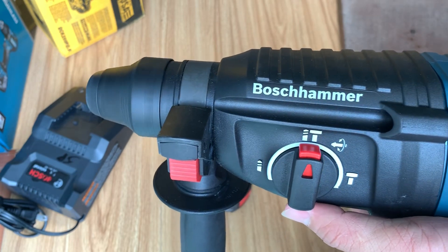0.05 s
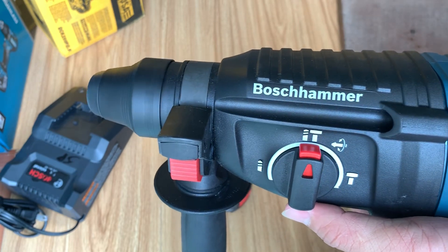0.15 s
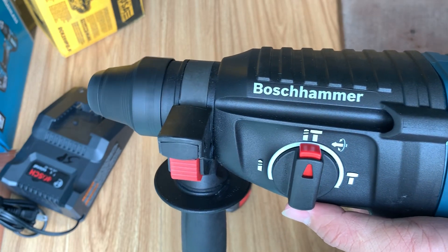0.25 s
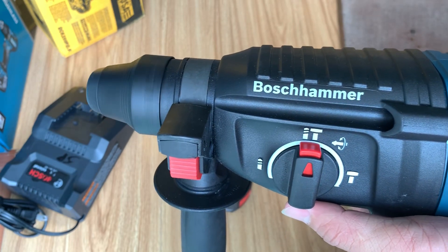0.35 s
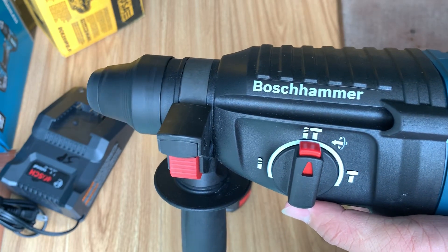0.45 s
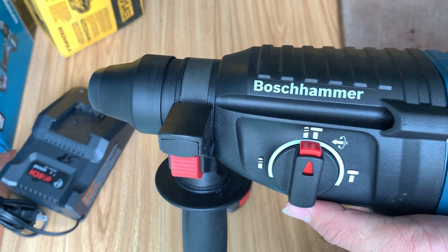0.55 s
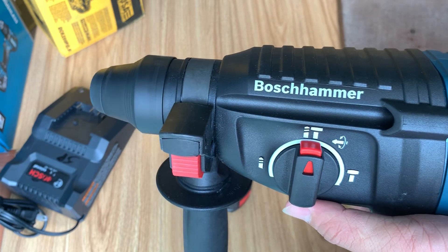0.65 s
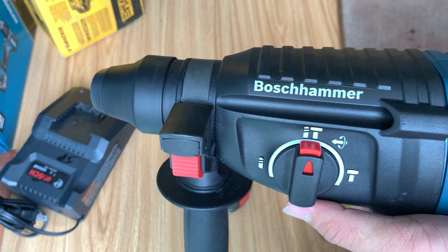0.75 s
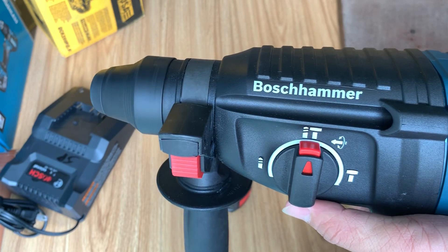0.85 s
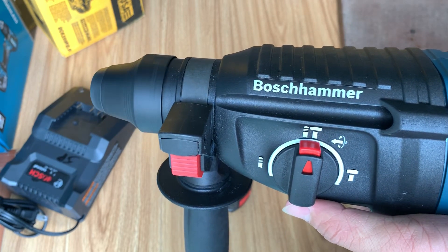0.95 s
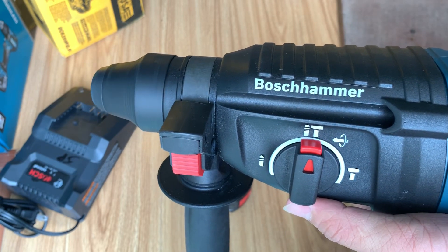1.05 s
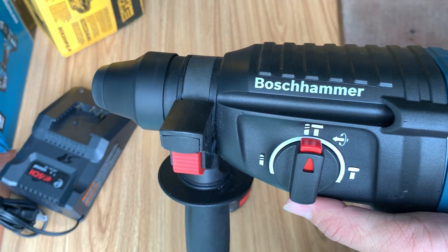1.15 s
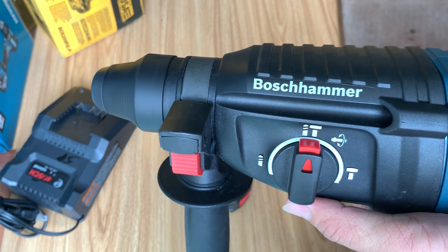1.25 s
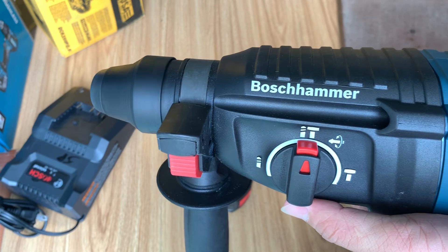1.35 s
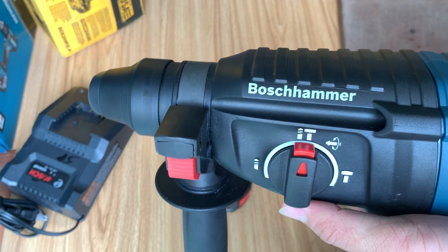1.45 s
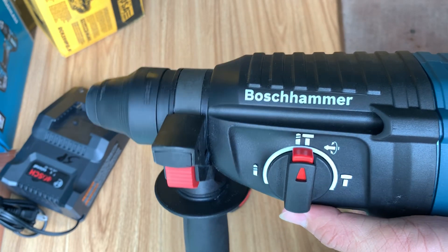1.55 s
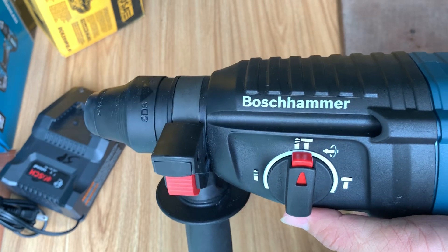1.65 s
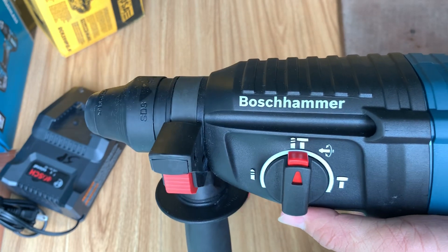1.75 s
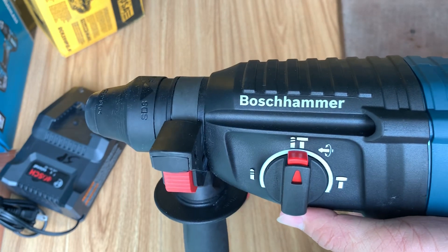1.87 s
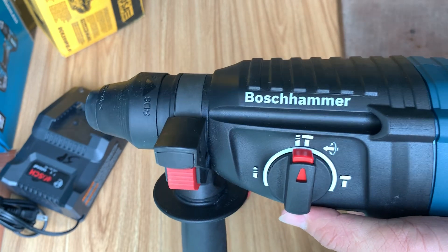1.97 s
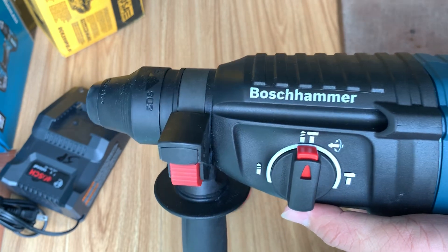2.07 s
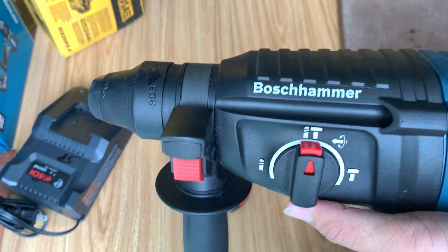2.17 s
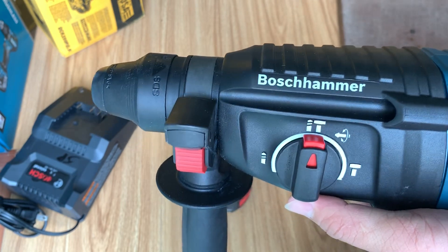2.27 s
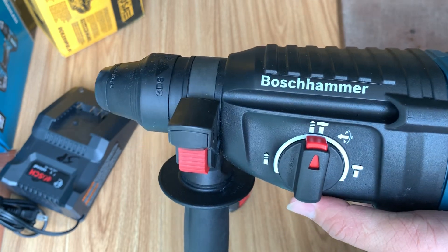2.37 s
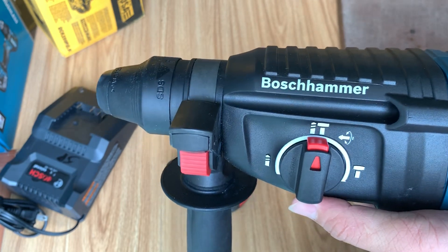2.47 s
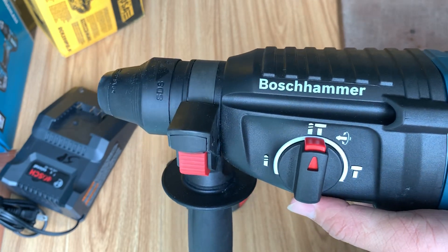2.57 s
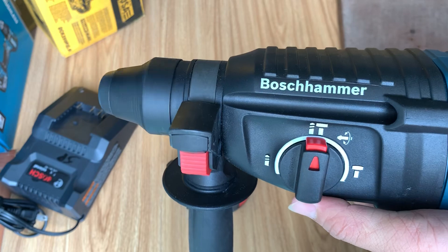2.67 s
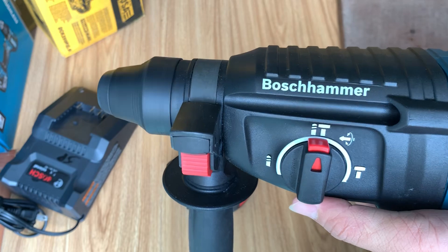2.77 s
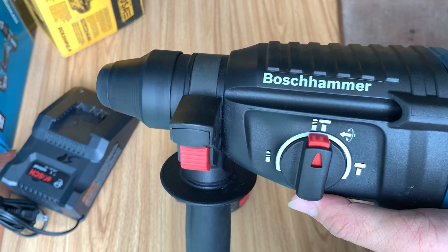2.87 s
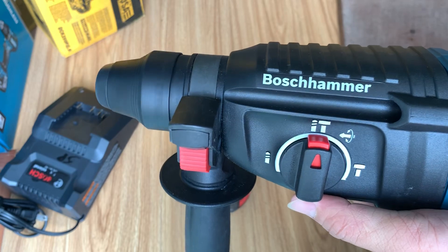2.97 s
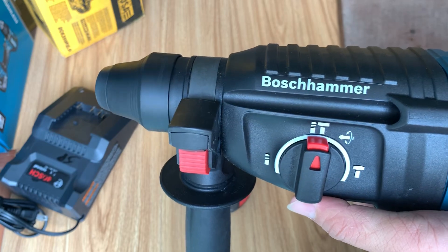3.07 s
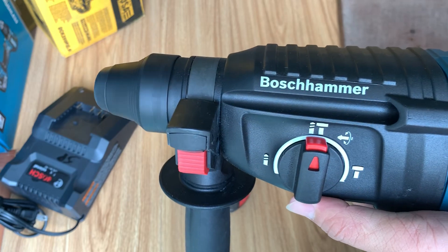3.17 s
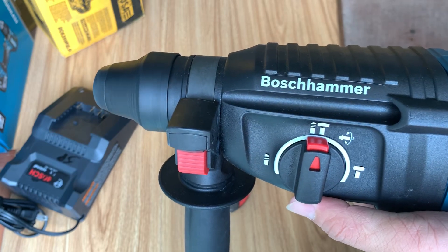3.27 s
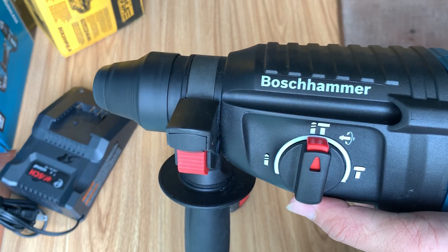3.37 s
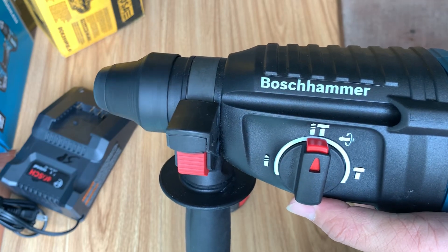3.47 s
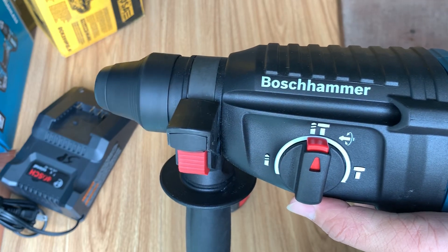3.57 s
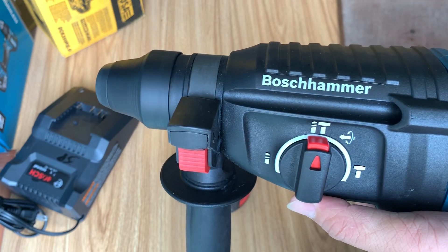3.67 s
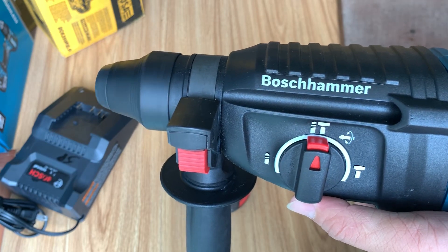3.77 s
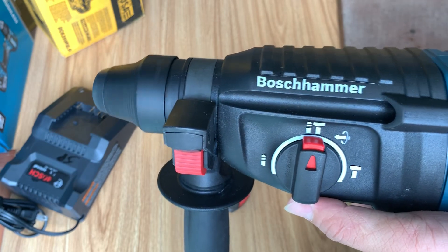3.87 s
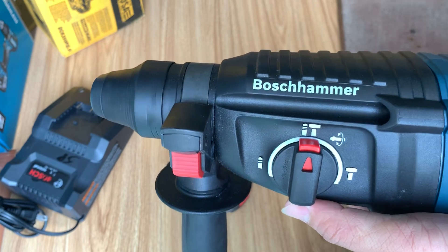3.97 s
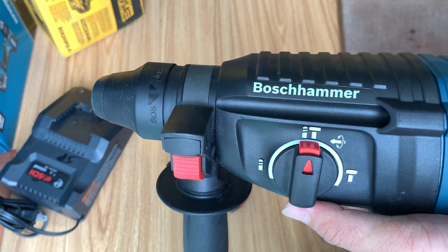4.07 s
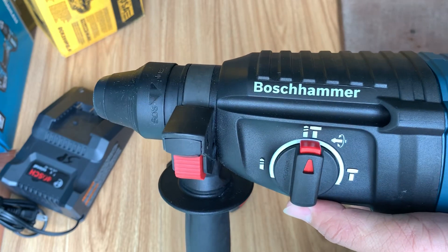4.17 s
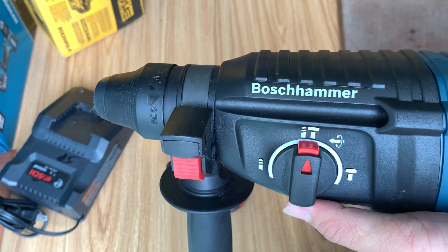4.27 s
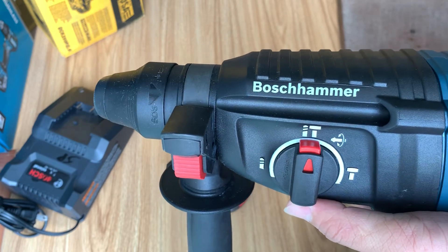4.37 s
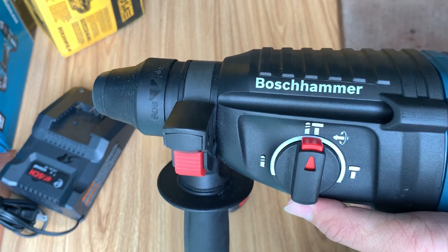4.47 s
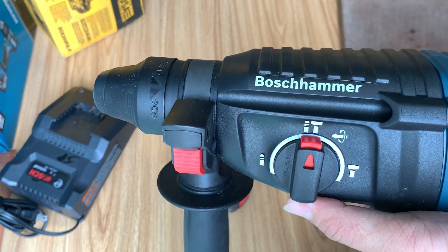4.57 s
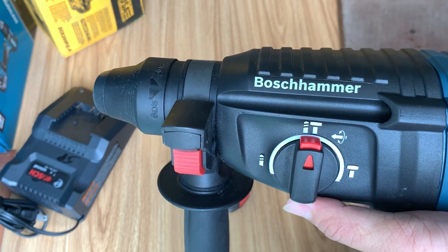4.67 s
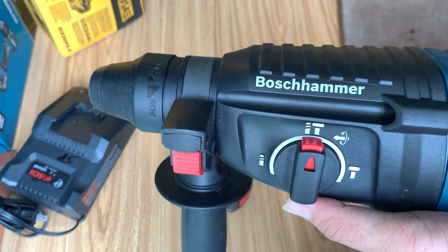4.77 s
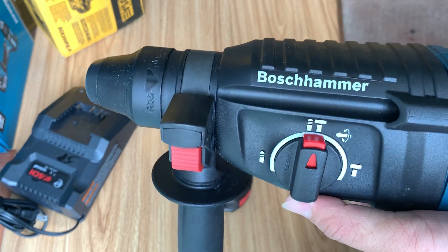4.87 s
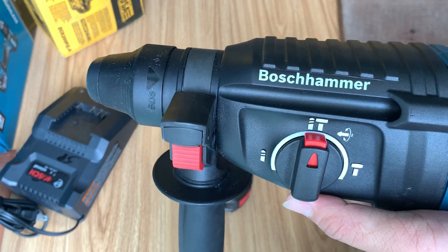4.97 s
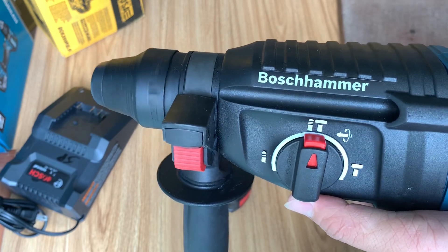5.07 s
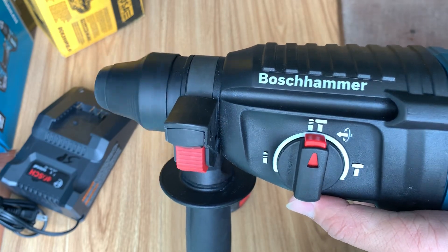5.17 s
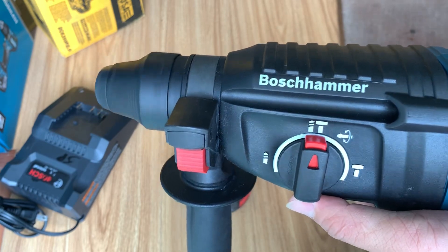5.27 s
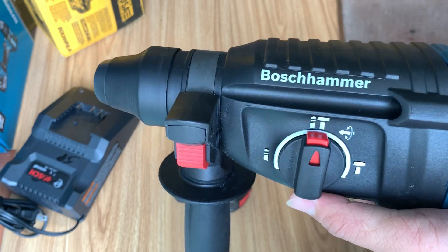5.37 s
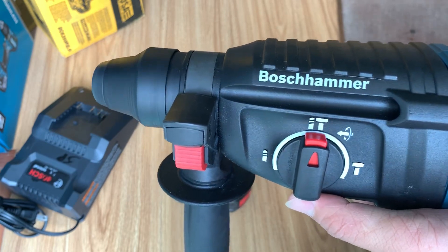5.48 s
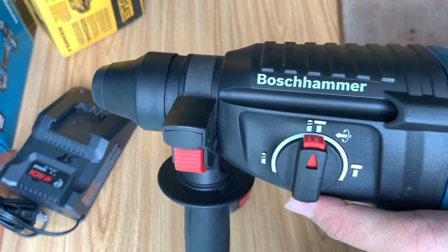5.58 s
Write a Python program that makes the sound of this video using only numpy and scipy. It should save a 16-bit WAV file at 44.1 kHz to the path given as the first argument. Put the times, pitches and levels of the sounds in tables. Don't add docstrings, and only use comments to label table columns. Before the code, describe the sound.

A handheld rotary hammer, already running without a bit, chatters at about seventy knocks a second with hard housing ring, gear grind and bright loose rattle. It stops, ticks down, and leaves clicks over distant engine rumble. A second pull whines briefly upward into slightly different hammering, then stops; a short third pull runs to the end. Close stereo microphone outdoors, very little reverberation.

```python
import sys
import numpy as np
from scipy import signal
from scipy.fft import rfft, irfft
from scipy.io import wavfile
from scipy.ndimage import uniform_filter1d

SR = 44100
rng = np.random.default_rng(int(sys.argv[2]) if len(sys.argv) > 2 else 0)


def master_out(mix):
    frames = np.transpose(np.atleast_2d(mix))
    ceiling = np.clip(frames, -1, 1)
    pcm = np.round(ceiling * 32767).astype(np.int16)
    wavfile.write(sys.argv[1], SR, pcm)


def nominal_scale(level):
    x = np.asarray(level, float) / 20
    return 10 ** x


N = 248095
TIME, HZ = np.arange(N) / SR, np.maximum(np.arange(N // 2 + 1) * SR / N, 1)

# motor_on_s, first_steady_blow_s, last_blow_s, blow_rate_hz, grip
PULLS = [
    (-1, .0051, 1.425, 72.16, 0),
    (2.628, 2.75345, 3.88, 72.14, 1),
    (5.056, 5.1791, 5.63, 72.15, 0),
]
# freq_hz, level_db_per_hz
GRIND = [
    [(110, -72.5), (180, -25), (310, -16), (400, -12.5), (514, -11), (562, -10), (715, -4.5), (801, 0.5),
     (932, -6), (1470, 1), (2120, -1), (2380, -5), (2600, -6), (2950, -1.5), (3700, -12), (4810, -58),
     (8140, -120)],
    [(110, -47.5), (180, -28), (238, -18), (284, -14), (465, -13), (562, 0), (646, -2), (801, 6),
     (864, -10), (1070, 0), (1200, 4), (1940, 0), (2560, -2.5), (2980, -2), (3700, -13.5), (4810, -55.5),
     (8140, -120)],
]
# freq_hz, level_db_per_hz
RATTLE = [(3300, 6.5), (3550, -15.5), (3750, -4.5), (4390, -1), (4680, -2.5), (5050, -0.5), (5420, -3.5),
          (5900, -1), (6830, -5), (7600, -6), (8700, -5.5), (9700, -8.5), (10700, 0), (11800, -14.5),
          (13000, -9.5), (14300, -16), (15750, -27)]


def rms_one(x):
    return x / np.sqrt(np.mean(x ** 2) + 1e-20)


def soft(x):
    return np.sin(np.pi / 2 * np.clip(x, 0, 1)) ** 2


def in_time(table):
    s, *columns = np.transpose(table)
    return [np.interp(TIME, s, c) for c in columns]


def at_hz(points):
    hz, value = np.transpose(points)
    return np.interp(np.log(HZ), np.log(np.maximum(hz, 1)), value)


def colour(x, spectrum):
    inward = np.minimum(np.log(HZ / spectrum[0][0]), np.log(spectrum[-1][0] / HZ))
    return rms_one(irfft(rfft(x) * nominal_scale(at_hz(spectrum)) * soft(inward / .05 + .5), N))


def drift(rate_hz):
    r = np.exp(-80 * np.pi * rate_hz / SR)
    slow = signal.lfilter([1], [1, -2 * r, r * r], rng.standard_normal(N // 40 + 2002))[2000:]
    return np.interp(np.arange(N) / 40, np.arange(len(slow)), rms_one(slow))


def spikes(times_s, heights):
    out = np.full(N, 1e-18)
    at = np.clip(np.round(np.asarray(times_s) * SR).astype(int), 0, N - 1)
    np.add.at(out, at, heights)
    return out


def ring(hits, hz, t60_s):
    r, w = nominal_scale(-60 / (t60_s * SR)), 2 * np.pi * hz / SR
    return signal.lfilter([0, np.sin(w)], [1, -2 * r * np.cos(w), r * r], hits)


def fade(hits, ms):
    return signal.lfilter([1], [1, -np.exp(-1000 / (ms * SR))], hits)


def narrow_noise(hz, width_hz):
    return rms_one(ring(rng.standard_normal(N), hz, 4.6 / width_hz))


def grains(spread_db):
    return rng.standard_normal((2, N)) * nominal_scale(spread_db * rng.standard_normal(N))


def pull(start, first, last, rate, grip, boom_db, top_db, housing_db, rattle_db):
    bite_delay_s, bite_rise_s = .106, .034
    settle_ms, settle_blows = 1.5, 1.4
    speed_wander_ms = .055
    return_ms, return_gain = (3.4, 4.1)[grip], (1.3, 2.2)[grip]
    tone_lag_ms = (2.5, 1.5)[grip]
    shade_db = (7.5, 8.5)[grip]
    rotor_turns, rotor_ripple = 6, .13
    # delay_ms, level_db
    jolt_rows = [
        [(.1, 1), (1.6, -7), (2.4, -8), (3.4, -8), (10.6, -10), (11.7, -9)],
        [(-2.6, -3), (-.5, -6), (.1, 0), (1.9, -6), (2.8, -6), (9.6, -8)],
    ]
    # blow_rate_multiple (negative = opposite phase), grip_0_db, grip_1_db
    gear_tones = [(1, -38, -37.5), (2, -37.5, -34), (3, -43, -38.5), (4, -38, -56), (5, -29.5, -57.5),
                  (8, -57, -26), (9, -40, -21.5), (10, -23.5, -59), (18, -22.5, -42), (-24, -20, -29.5),
                  (45.55, -30, -35), (52, -30.5, -25.5)]

    blows = np.arange(first, last, 1 / rate)
    chance = rng.standard_normal((len(blows), 2))
    blows = blows + .00003 * chance[:, 0]
    force = nominal_scale((.5, 1.5)[grip] * chance[:, 1] + .6 * np.interp(blows, TIME, drift(5)))
    early_ms = settle_ms * np.exp(-rate * np.maximum(TIME - first, 0) / settle_blows)
    late_ms = speed_wander_ms * drift(7.8) - (start > 0) * early_ms
    blows = blows + np.interp(blows, TIME, late_ms) / 1000
    force = force * np.clip((blows - start - bite_delay_s) / bite_rise_s, 0, 1)
    steady, on = (TIME > first) & (TIME < last + .01), TIME >= start
    knock = knocks(blows, grip, force, uneven_db=.6, boom_db=boom_db, top_db=top_db)

    delay_ms, jolt_db = np.transpose(jolt_rows[grip])
    jolts = nominal_scale(jolt_db + 2.5 * rng.standard_normal((len(blows), len(delay_ms))))
    jolts = spikes((blows[:, None] + delay_ms / 1000).ravel(), jolts.ravel())
    scuff = fade(spikes(blows[1:] - return_ms / 1000, return_gain), 1.3)
    scuff = scuff + (.6, .3)[grip] * fade(jolts, 2)
    rotor = np.cos(2 * np.pi * rotor_turns * (rate * (TIME - first - late_ms / 1000) - .015))
    shake = 4.2 * fade(jolts, .3) + .55 * fade(jolts, 3.5) + rotor_ripple * 2 * rotor
    grind = np.array([colour(g, GRIND[grip]) for g in grains(1.0) * (1 + scuff)])
    shaded = [(hz, db - shade_db * (10000 < hz < 11000)) for hz, db in RATTLE]
    contacts = grains(0.9) * (1 + shake) * nominal_scale(0.68 * drift(10))
    rattle = np.array([colour(g, shaded) for g in contacts])
    knock, grind, rattle = (v / np.std(v[..., steady]) for v in (knock, grind, rattle))

    turns = rate * (TIME - first - (late_ms + tone_lag_ms) / 1000)
    tones = 0
    for k, *db in gear_tones:
        phase = 2 * np.pi * k * turns + .006 * k * drift(8)
        tones = tones + nominal_scale(db[grip] + 2.5 * drift(9)) * np.sin(phase)
    grind_db = -11 * soft((TIME - start - .07) / .07) * (TIME < last + .01)
    low, high = nominal_scale(housing_db) * on, nominal_scale(rattle_db) * on
    direct = low * (nominal_scale(-6.0) * knock + nominal_scale(grind_db) * grind[0] + 1.35 * tones * steady)
    direct = direct + high * (nominal_scale(-3.5) * rattle[0] + 2.4 * chuck(blows, force))
    twin = low * nominal_scale(-1.5) * grind[1] + high * nominal_scale(.5) * rattle[1]
    return ports(direct, twin, grip), direct


def effort(start, first, last, levels):
    run_up_s, run_up_power = 0.11, (3.7, 4.3)
    let_go_db, let_go_s, coast_db_per_s = (6.5, 0.5), 0.014, (172.5, 170.5)
    speed = np.clip((TIME - start) / run_up_s, 1e-4, 1)
    after_s = np.maximum(TIME - last, 0)
    steady_s = np.clip(TIME, first, last) - first
    out = []
    for k in range(2):
        level_db = levels[k] - levels[k + 2] * steady_s + 20 * run_up_power[k] * np.log10(speed)
        release_db = let_go_db[k] * (1 - np.exp(-after_s / let_go_s)) + coast_db_per_s[k] * after_s
        out.append(level_db - release_db)
    return out


def knocks(times, grip, force, uneven_db, boom_db=0, top_db=0):
    grip_wander_db = .9
    # delay_ms, strength
    rebound = [
        (1.36, .3),
        (1.1, -.4),
    ]
    # freq_hz, t60_ms, level_db, polarity
    modes_a = [(365.3, 86, -24, 1), (436, 86, -18.5, -1), (576.8, 55, -10.5, -1), (793.4, 40.3, -5, 1),
               (966, 32, -26, 1), (1184, 70, -7.5, 1), (1453, 28, -3, -1), (1519, 64, -17, -1),
               (1640, 70, -16, -1), (1877, 12, -1.5, 1), (1883, 38, -19.5, -1), (1958, 50, -14, 1),
               (2090, 89, -27.5, -1), (2306, 20, -1, 1), (2504, 35, -5.5, -1), (2838, 17, 0, -1),
               (3130, 22, -4.5, 1), (3370, 34, -20.5, -1)]
    # freq_hz, t60_ms, level_db, polarity
    modes_b = [(288, 95, -33.5, 1), (368, 20, -26.5, -1), (688.4, 42, -13.5, 1), (765, 63, -23, 1),
               (992.4, 85, -23, -1), (1243, 64, -22.5, -1), (1292, 55, -25.5, 1), (1450, 70, -24, -1),
               (1459, 100, -29, 1), (1623, 23, -22.5, -1), (1794, 13, 0, -1), (2294, 46, -17, 1),
               (2283, 100, -28.5, -1), (2465, 31, -22, 1), (2630, 22, -26, -1), (2955, 18, -10.5, 1),
               (3038, 70, -29, 1), (3300, 40, -22.5, -1), (1717, 60, -24.5, 1), (1936, 57, -23, -1),
               (2190, 51, -21, 1)]

    delay_ms, strength = rebound[grip]
    modes = (modes_a, modes_b)[grip]
    uneven = force[:, None] * nominal_scale(uneven_db * rng.standard_normal((len(times), len(modes))))
    strength = strength + .17 * rng.standard_normal(len(times))
    hit_times = np.r_[times, times + delay_ms / 1000]
    out = 0
    for (hz, t60_ms, level_db, polarity), heights in zip(modes, uneven.T):
        wander_db = grip_wander_db * (1 + (hz < 900)) * np.interp(times, TIME, drift(3))
        heights = heights * nominal_scale(wander_db)
        hits = spikes(hit_times, np.r_[heights, strength * heights])
        mode_db = level_db + boom_db * (hz < 900) + top_db * (hz > 2700)
        out = out + polarity * nominal_scale(mode_db) * ring(hits, hz, t60_ms / 1000)
    return signal.sosfilt(signal.butter(3, 210, "high", fs=SR, output="sos"), out)


def chuck(times, force):
    # freq_hz, t60_ms, level_db
    holder_modes = [(4370, 34, -13.5), (5030, 28, -17), (6750, 2.8, -23.5), (3880, 14, -24),
                    (5850, 14, -20.5), (7250, 10, -23), (6550, 12, -26)]
    out = 0
    for hz, t60_ms, level_db in holder_modes:
        lag, size = rng.standard_normal((2, len(times)))
        hits = spikes(times + .0008 + .0003 * lag, force * nominal_scale(4 * size))
        out = out + nominal_scale(level_db) * ring(hits, hz, t60_ms / 1000)
    return out


def coasting(grip):
    # time_s, peak_db, clatter_db re peak
    coast_blows = [(1.437, -7, -17), (1.456, -14, -11.5), (1.479, -34.5, -27), (1.513, -21, -13.5),
                   (1.54, -20.5, -13), (1.552, -26.5, -21.5), (1.594, -37, -10.5), (2.657, -35, -4.5),
                   (2.666, -24.5, -7.5), (2.693, -28, -22.5), (2.701, -23, -5), (2.721, -21, -10.5),
                   (2.738, -15.5, -11), (3.891, -6, -17.5), (3.913, -16.5, -10.5), (3.939, -24, -13.5),
                   (3.941, -27.5, -5.5), (3.957, -29.5, -15), (3.974, -18.5, -10.5), (4.008, -18.5, -18.5),
                   (4.018, -28.5, -7), (5.127, -18.5, -9.5), (5.141, -19, -11.5), (5.163, -5.5, -15.5),
                   (5.178, -6.5, -18)]
    mine = [row for row in coast_blows if (2 < row[0] < 5) == grip]
    times, peak_db, bright_db = np.transpose(mine)
    out = nominal_scale(-20) * knocks(times, grip, nominal_scale(peak_db), uneven_db=2.5)
    out = out + chuck(times, nominal_scale(peak_db + bright_db + 12))
    clatter = [(hz, db - (1.5, 9.0)[grip] * (hz > 8000)) for hz, db in RATTLE]
    for level_db, spectrum in ((peak_db - 9, GRIND[1]), (peak_db + bright_db, clatter)):
        burst = rng.standard_normal(N) * fade(fade(spikes(times, nominal_scale(level_db)), 0.89), 3.1) / 35
        out += colour(burst, spectrum) * np.std(burst)
    return out


def whine():
    base_hz, base_db = 3200, -23.5
    # time_s, offset_hz, second_pull_db, third_pull_db
    steps = [(0, -70, -19, -40), (.015, -29.5, -20, -38), (.023, -26, -30, -36), (.035, -26, -18, -22),
             (.045, -1, -17, -16), (.058, -1, -26, -14), (.066, 10, -13, -22), (.075, 32, -12, -13),
             (.095, -8, -6, -7), (.112, -31, -19, -18), (.128, 0, 2, -2), (.14, 40, 1.5, -2),
             (.155, 78, -6, -7), (.23, 80, -24, -24)]
    s, above_hz, *levels = np.transpose(steps)
    out = np.zeros(N)
    for (start, *_), db in zip(PULLS[1:], levels):
        turns = np.cumsum(base_hz + np.interp(TIME - start, s, above_hz)) / SR
        level_db = base_db + np.interp(TIME - start, s, db, -150, -150) + 1.5 * drift(30)
        out += nominal_scale(level_db) * np.sin(2 * np.pi * turns + .45 * drift(50))
    return out


def gear_song():
    # time_s, freq_hz, level_db
    mesh = [(2.69, 1307, -56.5), (2.708, 1506, -41.5), (2.721, 1930, -35), (2.745, 2014, -29),
            (2.77, 2096, -53)]
    s, hz, db = np.transpose(mesh)
    phase = 2 * np.pi * np.cumsum(np.interp(TIME, s, hz)) / SR + .5 * drift(70)
    return nominal_scale(np.interp(TIME, s, db, -150, -150)) * np.sin(phase)


def ports(x, twin, grip):
    # freq_hz, likeness
    likeness = [(200, .85), (1000, .98), (1800, .97), (2800, .85), (4500, .62), (8000, .9), (14000, .95)]
    # freq_hz, left_minus_right_db
    tilt = [
        [(60, 9), (110, -11), (200, 5.5), (380, 0), (700, -9.5), (1290, 2), (2380, 0.5), (4400, -1.5),
         (8120, -1), (15000, 1)],
        [(60, 1.5), (110, 0.5), (200, -6), (380, -4.5), (700, -3), (1290, 1), (2380, 1), (4400, -2.5),
         (8120, -1.5), (15000, 1)],
    ]
    # freq_hz, left_lead_rad
    lead = [
        [(0, -0.5), (340, -1.4), (1030, 0.85), (3190, 0.5), (3790, 6), (5430, 3.5), (6720, 5), (8870, 3),
         (11400, -3), (12300, -10), (13000, -7), (14000, -16), (14500, -20.5), (15300, -3)],
        [(0, 5.5), (780, -1.5), (2240, 1.5), (3360, -2), (5770, -0.86), (7240, -8), (8350, -9), (10900, -28),
         (11100, -8), (12300, -22.5), (12700, -29), (14000, -39), (14600, -39.5), (15300, -28)],
    ]
    alike = at_hz(likeness)
    half = nominal_scale(at_hz(tilt[grip]) / 2) * np.exp(.5j * at_hz(lead[grip]))
    same = np.sqrt((1 + alike) / 2) * rfft(x)
    other = np.sqrt((1 - alike) / 2) * rfft(twin)
    return irfft(np.array([(same + other) * half, (same - other) / half]), N)


def clicks():
    room_send_db = -13.5
    # time_s, peak_db, brightness_0_1, left_minus_right_db, length_ms
    snaps = [(1.677, -51.5, 0.6, -5, 3.2), (1.883, -57.5, 0.08, -9.5, 4.7), (1.92, -49, 0.84, -10, 5.1),
             (1.9313, -27.5, 0.92, -16, 0.7), (1.9331, -28.5, 0.9, -3, 2), (2.222, -56, 0.1, 8.5, 4.3),
             (2.526, -43, 0.46, -7.5, 4.2), (2.563, -48.5, 0.3, -9, 5), (2.601, -55, 0.3, -10, 3.9),
             (2.619, -37, 0.1, -5, 4.6), (2.63, -30, 0.15, -3, 2.2), (2.6645, -30, 0.6, -4, 1.5),
             (5.127, -25.5, 0.7, 0, 2), (2.6251, -28, 0.33, -10, 2.5), (4.238, -58, 0.37, -11, 3.3),
             (4.309, -56, 0.6, -9, 8.3), (4.352, -58.5, 0.43, -15, 3.3), (4.635, -52, 0.2, 7, 5.96),
             (4.985, -59, .6, -6, 15), (4.995, -53, 0.3, -8.5, 3), (5.041, -50, 0.5, 2, 10),
             (5.062, -33, 0.6, -3, 3), (5.034, -40, 0.1, 8, 2.8), (5.0498, -33, 0.3, -17, 2.5),
             (5.0553, -25, 0.49, 10.5, 3)]
    # freq_hz, level_db_per_hz
    snap_spectrum = [(400, -45), (800, -34.5), (1100, -17), (2000, -25), (3000, -12.5), (4500, -13),
                     (6500, -15.5), (8000, -25), (12900, -35), (15500, -48)]
    # freq_hz, level_db_per_hz
    clunk_spectrum = [(180, -49), (300, -4.5), (674, 4.5), (1420, -0.5), (2610, -4.5), (3070, -18),
                      (3630, -24.5), (4880, -27), (7620, -36.5), (10800, -18.5), (15500, -28)]
    out, sent = np.zeros((2, N)), np.zeros(N)
    white = rng.standard_normal(N)
    dull, bright = colour(white, clunk_spectrum), colour(white, snap_spectrum)
    age_ms = 1000 * np.arange(2000) / SR
    for s, peak_db, share, pan_db, ms in snaps:
        at = round(s * SR)
        burst = (share * bright + (1 - share) * dull)[at:at + 2000]
        burst = burst * np.exp(-age_ms / ms) * soft(age_ms)
        burst = nominal_scale(peak_db) * burst / np.abs(burst).max()
        out[:, at:at + 2000] += burst * nominal_scale(np.array([[pan_db], [-pan_db]]) / 2)
        sent[at:at + 2000] += nominal_scale(room_send_db) * burst
    return out, sent


def room(x):
    t60_s = .42
    age_s = TIME[:SR]
    echoes = rng.standard_normal((2, SR)) * soft(age_s / .012)
    dull = signal.lfilter(*signal.butter(1, 4000, fs=SR), echoes)
    tail = dull * nominal_scale(-60 * age_s / t60_s) + (echoes - dull) * nominal_scale(-105 * age_s / t60_s)
    return irfft(rfft(x) * rfft(.09 * tail, N), N)


def traffic():
    floor_db = -68.5 + 7.5
    # freq_hz, level_db_per_hz
    ambience = [(38, -12.5), (60, -14.5), (140, -8.5), (185, -24), (260, -19.5), (370, -23), (480, -34),
                (900, -33), (2000, -41), (4000, -50), (6500, -63.5), (12000, -78.5)]
    # time_s, level_db
    course = [(0, 5), (1.6, -1), (2.2, 2), (2.6, 1), (4.1, -1.5), (4.5, -2), (5.0, 0), (5.62, 6)]
    mid, side = (colour(rng.standard_normal(N), ambience) for _ in range(2))
    level_db = floor_db + in_time(course)[0] + 1.2 * drift(3.2)
    return nominal_scale(level_db) * (mid + .35 * side * [[1], [-1]])


def far_engine():
    # time_s, cycle_hz, level_db
    course = [(0.0, 20.4, -60), (0.5, 22, -56), (1.2, 21.8, -56), (1.6, 21.7, -54), (2.1, 21.5, -56),
              (2.3, 22, -58), (2.75, 23.3, -59), (3.9, 24.8, -61), (5.05, 27.2, -57), (5.62, 27.8, -59)]
    # cycle_multiple, level_db, phase_rad
    orders = [(2, -1, 0), (3, -11, 1), (4, -7, 1.6), (5, 3, 0), (6, -4, 1.6), (7, -10, 3)]
    cycle_hz, engine_db = in_time(course)
    out = np.zeros((2, N))
    for k, order_db, turn in orders:
        phase = 2 * np.pi * k * np.cumsum(cycle_hz) / SR + turn + .4 * drift(5)
        level_db = engine_db + order_db + 1.0 * drift(.8)
        out += nominal_scale(level_db) * np.sin(phase + np.array([[-.4], [.4]]))
    return out


def far_tones():
    # start_s, stop_s, freq_hz, width_hz, level_db
    calls = [(1.7, 1.87, 4500, 700, -80), (1.78, 1.805, 4250, 200, -75), (1.82, 1.855, 4350, 250, -75),
             (4.66, 4.9, 4400, 900, -81), (4.785, 4.82, 4500, 200, -78), (4.83, 4.87, 4150, 450, -73),
             (4.335, 4.6, 900, 12, -76), (4.35, 4.5, 1195, 14, -77.5), (4.3, 4.45, 610, 14, -76),
             (2.05, 2.5, 45, 10, -56), (2.25, 2.38, 620, 40, -76)]
    out = np.zeros(N)
    for start, stop, hz, width_hz, db in calls:
        swell = np.sin(np.pi * np.clip((TIME - start) / (stop - start), 0, 1) ** .7) ** 1.2
        out += nominal_scale(db) * narrow_noise(hz, width_hz) * swell
    return out


def scene():
    room_send_db = -28
    boom_db = (-2.5, -1.5, -4.5)
    top_db = (1.5, -1.2, -0.5)
    # housing_db, rattle_db, housing_sag_db_per_s, rattle_sag_db_per_s
    full_effort = [
        (-16.5, -23, 1.46, 0.34),
        (-15.5, -22, 1.5, 2),
        (-15.5, -21, -1.5, -1),
    ]
    heard, sent = clicks()
    for row, levels, boom, top in zip(PULLS, full_effort, boom_db, top_db):
        stereo, mono = pull(*row, boom, top, *effort(*row[:3], levels))
        heard, sent = heard + stereo, sent + nominal_scale(room_send_db) * mono
    for grip, extra in enumerate([coasting(0) + whine() + gear_song(), coasting(1)]):
        heard = heard + ports(extra, 0 * extra, grip)
        sent = sent + nominal_scale(room_send_db) * extra
    return heard + room(sent) + traffic() + far_engine() + far_tones()


def drop_weak_bands(dry):
    # low_hz, high_hz, grip_0_dropped_share, grip_1_dropped_share
    weak_bands = [(8350, 8950, .6, .85), (11200, 11600, .75, .6), (11600, 11900, .8, .75),
                  (11900, 12250, .99, .99), (13300, 13800, .12, 0), (13800, 14300, .5, .05),
                  (14300, 14600, .9, .6), (14600, 16000, 1, 1)]
    # start_s, length_s
    spells = [(.095, .128), (.578, .096), (.787, .056), (.903, .062), (1.09, .035), (1.23, .075),
              (1.416, .04), (2.655, .07), (2.855, .038), (3.204, .025), (3.6, .008), (3.713, .056),
              (3.853, .078), (3.972, .03), (1.508, .04), (5.157, .036), (5.337, .042), (5.429, .042)]
    running = sum((TIME > first - .06) & (TIME < last + .2) for _, first, last, *_ in PULLS)
    kept = np.any([(TIME > s) & (TIME < s + length) for s, length in spells], axis=0)
    open_to_loss = running * ~kept
    spectrum = rfft(dry)
    luck = rng.random((N // 2048 + 2, len(weak_bands)))
    luck = np.repeat(luck, 2048, axis=0)[397:N + 397]
    for (low_hz, high_hz, *share), chance in zip(weak_bands, luck.T):
        band = soft((HZ - low_hz) / 60 + .5) - soft((HZ - high_hz) / 60 + .5)
        dropped = open_to_loss * (chance < np.where((TIME > 2) & (TIME < 5), share[1], share[0]))
        dry = dry - uniform_filter1d(dropped * 1., size=300) * irfft(spectrum * band, N)
    return dry


def band_limit(x):
    return signal.sosfilt(signal.butter(12, 15750, fs=SR, output="sos"), x)


def record(dry):
    mix = drop_weak_bands(dry)
    return band_limit(mix)


dry = scene()
out = record(dry)
master_out(out)
```